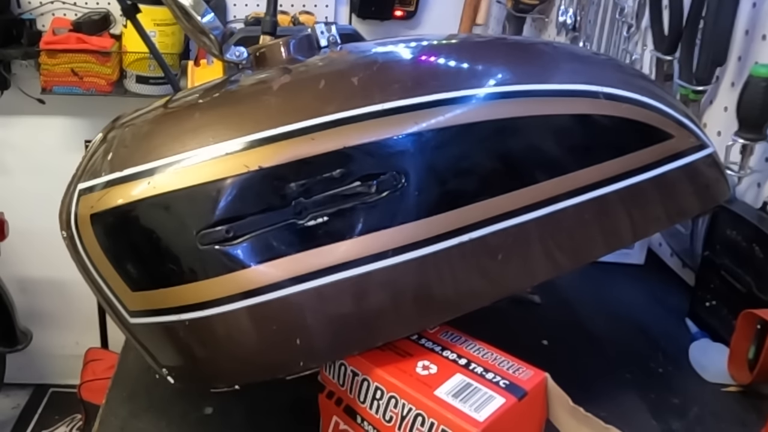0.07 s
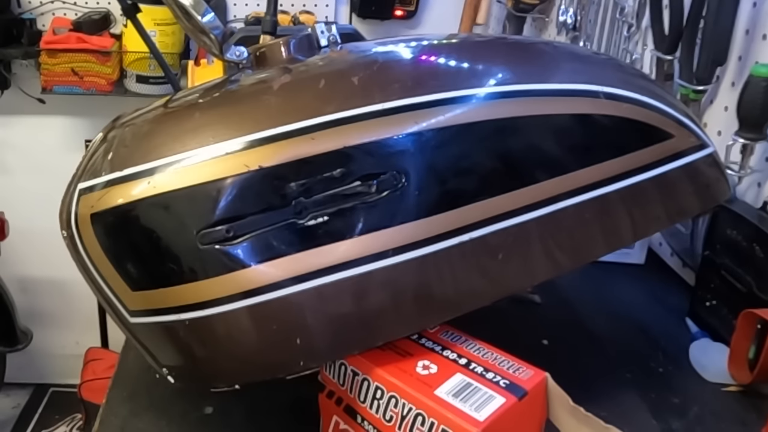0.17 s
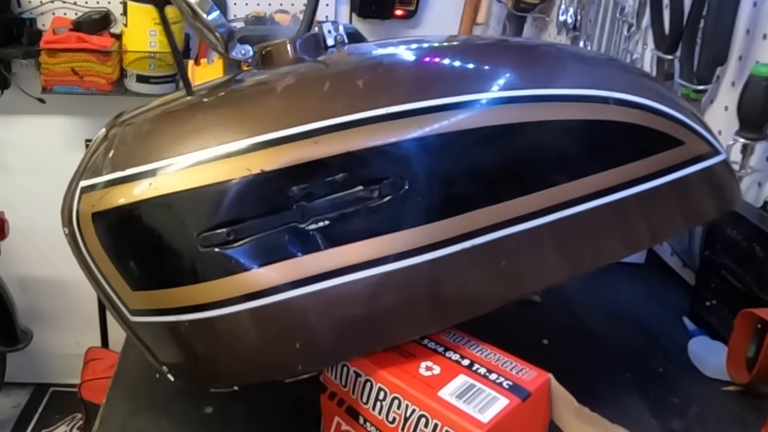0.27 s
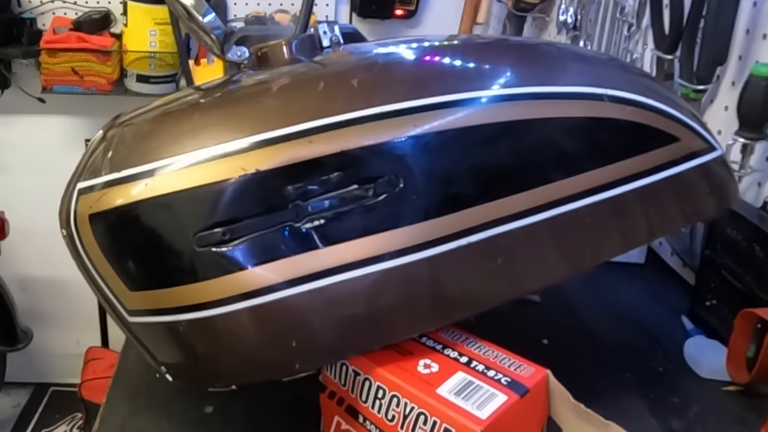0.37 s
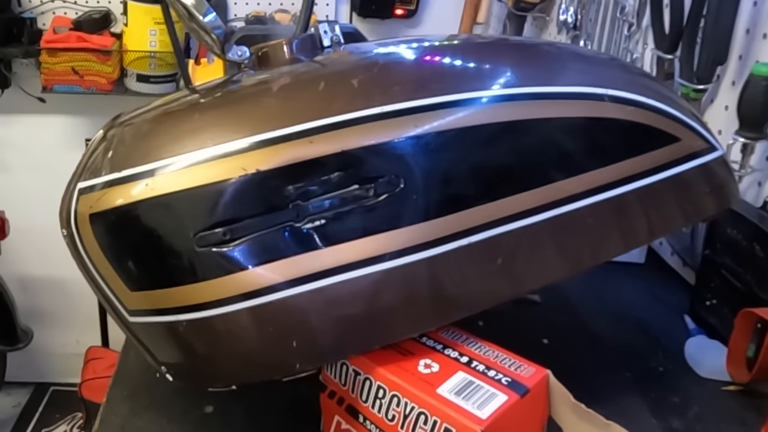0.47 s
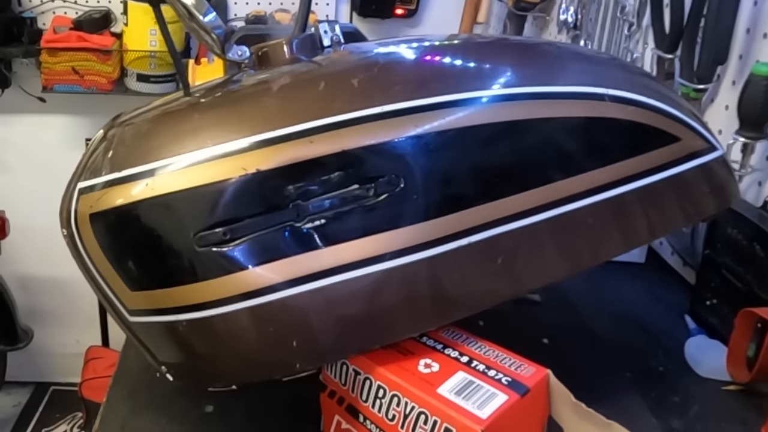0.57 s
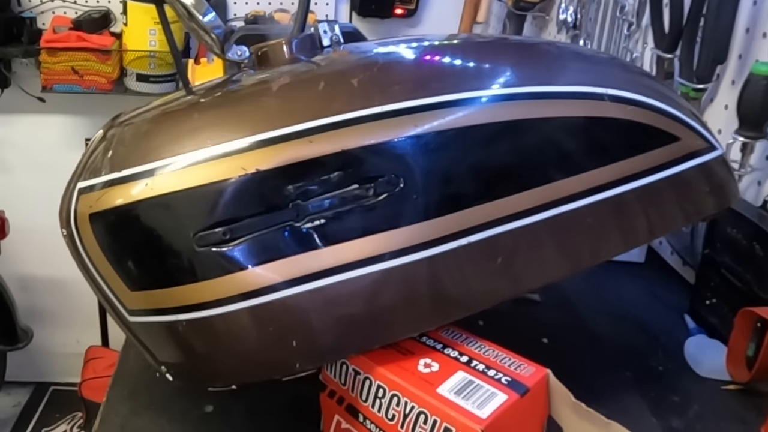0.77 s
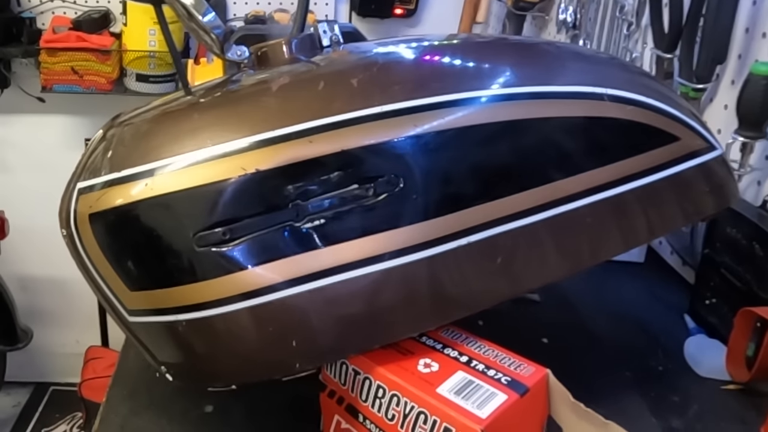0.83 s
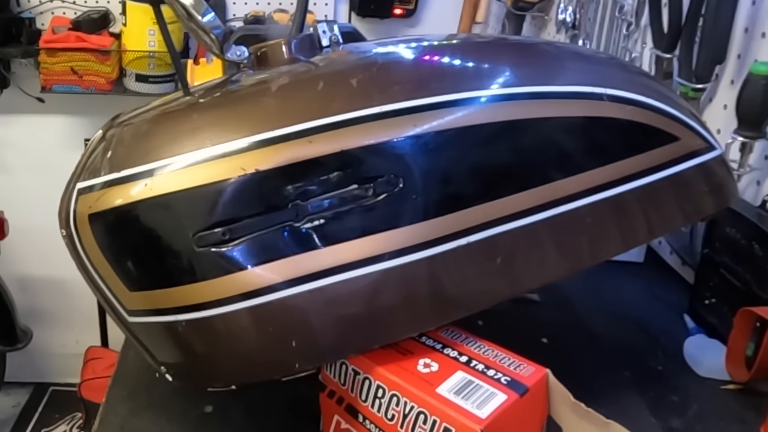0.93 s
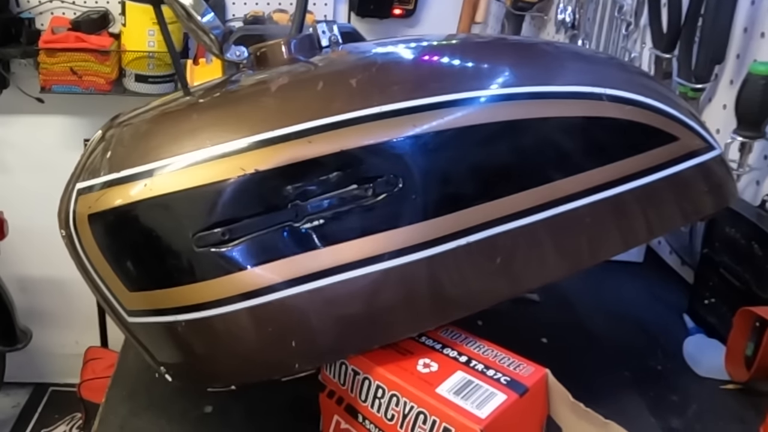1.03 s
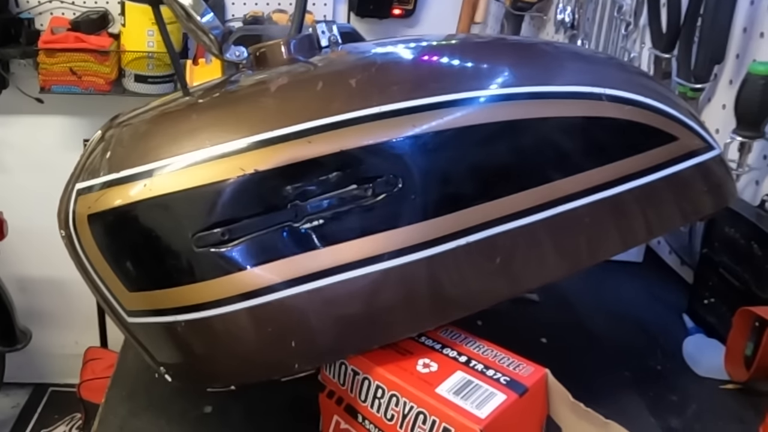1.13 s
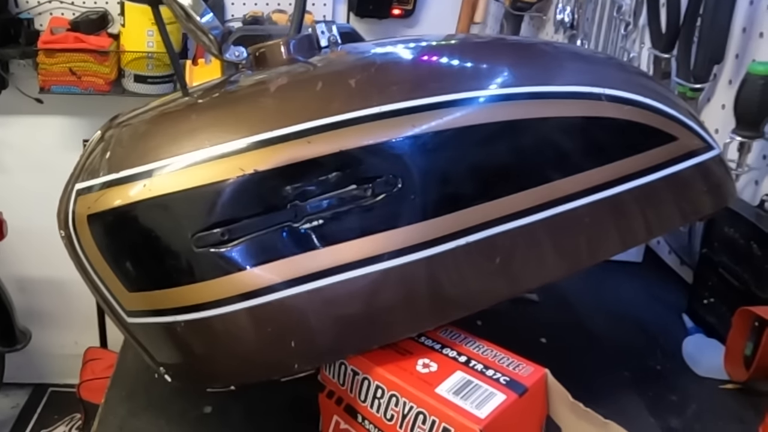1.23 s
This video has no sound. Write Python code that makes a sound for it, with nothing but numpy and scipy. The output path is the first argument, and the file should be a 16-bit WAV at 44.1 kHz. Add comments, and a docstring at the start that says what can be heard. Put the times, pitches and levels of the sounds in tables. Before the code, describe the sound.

One sudden, hollow bang from a metal tank in a workshop with a humming fan.

```python
"""A steel fuel tank gives one sudden bang in a small workshop.
The shell cracks and rings briefly; close low modes beat as the boom dies into the room.
A fan hums throughout, over steady room hum and rushing air.
Its pitch sags at the bang and creeps back; its level rises slowly from the bang on."""
import sys
import numpy as np
from scipy import signal
from scipy.fft import rfft, irfft, next_fast_len
from scipy.io import wavfile
from scipy.ndimage import uniform_filter1d, minimum_filter1d, map_coordinates

SR = 44100
rng = np.random.default_rng(int(sys.argv[2]) if len(sys.argv) > 2 else 0)


def dump(signal):
    """Clip the signal to [-1, 1] and save it as 16-bit WAV at the path in sys.argv[1]."""
    limited = np.clip(np.atleast_2d(signal).T, -1, 1)
    pcm = np.round(limited * 32767).astype(np.int16)
    wavfile.write(sys.argv[1], SR, pcm)


N = 57330

# workshop hum lines (frequency [Hz], rms level [dB])
HUM_LINES = [(119.5, -65), (156, -59.5), (222, -56), (240, -55), (292, -60.5), (350, -61.5), (548, -64),
             (645, -51.5), (1049, -66.5), (1193, -66)]
# rushing air (frequency [Hz], relative density [dB])
AIR_SPECTRUM = [(25, -32), (50, -9), (90, -10), (140, -2), (230, -3.5), (450, 0), (620, 3.5), (800, 2),
                (1100, -5.5), (1800, -11), (3000, -16.5), (6000, -20.5), (9000, -29.5), (12000, -40),
                (15500, -47)]
# fan tones (multiple of blade pitch, rms level before the bang [dB])
FAN_HARMONICS = [(1, -45), (4, -67)]
# wash of shell and room (frequency [Hz], relative density [dB])
WASH_SPECTRUM = [(25, -26), (60, -32), (105, -7.5), (180, -2.5), (250, -5), (320, -5.5), (400, 0.5),
                 (600, 0), (900, 0), (1200, -8), (1600, -7.5), (2300, -19), (4000, -23.5), (8000, -32),
                 (15500, -50.5)]
# wash decay (frequency [Hz], T60 [s])
WASH_DECAY = [(100, 0.57), (500, 0.6), (900, 0.6), (2000, 0.65), (6000, 0.62), (14000, 0.37)]
# brief, hard resonances of the blow (frequency [Hz], gain [dB], rise [s], T60 [s])
CLANK_MODES = [(830, 5, 0.001, 0.0093), (1420, 4, 0.016, 0.053), (2642, -15.5, 0.0024, 0.047),
               (3067, -10.5, 0.0025, 0.032)]
# first snap of the sheet (frequency [Hz], relative density [dB])
CRACK_SPECTRUM = [(60, -37), (350, -44), (800, 3.5), (1500, -7.5), (2200, -11.5), (3100, -9.5), (5000, -20),
                  (9000, -32.5), (15500, -34)]
# steel shell ring (frequency [Hz], gain [dB], T60 [s])
SHELL_MODES = [(431, -23.5, 0.53), (490, -20, 0.51), (554, -17.5, .42), (586.2, -16.5, 0.32),
               (616.6, -14.5, 0.45), (660, -29, .42), (756.4, -19.5, 0.69), (807.6, -26, 0.6),
               (870, -39, .58), (923, -25, .62), (967, -32, 0.83), (1077, -36, 0.96), (1102, -25, 0.43),
               (1390, -23.5, 0.59)]
# close modes of the hollow boom (frequency [Hz], gain [dB])
BOOM_MODES = [(305, -6), (310.7, -4), (317.1, -8), (329.2, -8.5), (331.7, -14.5), (336, -4.5), (370, -13.5)]
# deep air modes (frequency [Hz], gain [dB], T60 [s])
THUD_MODES = [(49.5, -30, 0.77), (71.6, -26.5, .5), (123.3, -23.5, 0.38), (156.6, -27.5, .5)]

BANG_S = 0.2187
AIR_DB, HUM_FLUTTER_DB, HUM_WAVER_RAD = -43, 4, 0.51
BLADE_HZ, FAN_WAVER_HZ, FAN_FLUTTER_DB, FAN_GROWTH_DB_PER_S = 599.2, 2.2, 2.5, 4
SAG_HZ, SAG_S, RECOVER_S, SETTLED_DROP_HZ = 18, 0.2596, 0.168, 4.05
WASH_DB, WASH_RISE_S = -12, 0.0029
CRACK_DB, CRACK_RISE_S, CRACK_T60_S = -14.5, 0.0008, 0.095
SHELL_RISE_S, THUD_RISE_S = 0.009, 0.0033
BOOM_RISE_S, BOOM_T60_S = 0.055, 0.52
CEILING, LIMITER_S, LOWPASS_HZ = 0.84, 0.0066, 15750


def amp(db):
    """Decibels to gain."""
    return 10 ** (np.asarray(db) / 20)


def along(points, hz):
    """Interpolate (frequency [Hz], value) points on a log frequency axis."""
    knots_hz, values = np.transpose(points)
    return np.interp(np.log(hz + 1), np.log(knots_hz + 1), values)


def wobble(knots_per_s):
    """Smooth random curve, rms near 1."""
    return map_coordinates(rng.standard_normal(N), [np.arange(N) * knots_per_s / SR + 2], order=3)


def filtered(x, response):
    """Zero-phase filter with gain response(hz)."""
    size = next_fast_len(N + SR // 2)
    hz = np.fft.rfftfreq(size, 1 / SR)
    return irfft(rfft(x, size) * response(hz), size)[..., :N]


def noise(spectrum):
    """Coloured noise, rms 1."""
    x = filtered(rng.standard_normal(N), lambda hz: amp(along(spectrum, hz)))
    return x / x.std()


def since_bang():
    """Time since the bang [s], zero before it."""
    return np.maximum(np.arange(N) / SR - BANG_S, 0)


def decay(t, t60_s):
    """Gain falling 60 dB per t60_s."""
    return np.exp(-np.log(1000) * t / t60_s)


def struck(rise_s, t60_s):
    """Envelope: swells from the bang, dies away."""
    t = since_bang()
    return (1 - np.exp(-t / rise_s)) * decay(t, t60_s)


def mode(hz, db, rise_s, t60_s):
    """One resonance excited by the bang."""
    return amp(db) * struck(rise_s, t60_s) * np.sin(2 * np.pi * hz * since_bang())


def alternating_modes(modes, rise_s):
    """Sum of modes; neighbours swing in opposite senses."""
    return sum((-1) ** k * mode(hz, db, rise_s, t60_s) for k, (hz, db, t60_s) in enumerate(modes))


def workshop():
    """Slightly unsteady hum lines over rushing air."""
    t = np.arange(N) / SR
    hum = 0
    for hz, db in HUM_LINES:
        rms = amp(db + HUM_FLUTTER_DB * wobble(12.11))
        phase_rad = 2 * np.pi * (hz * t + rng.random()) + HUM_WAVER_RAD * wobble(14.67)
        hum += rms * np.sin(phase_rad)
    return np.sqrt(2) * hum + amp(AIR_DB) * noise(AIR_SPECTRUM)


def fan():
    """Blade tone: slows after the bang, recovers to just under its old pitch, grows louder."""
    t = since_bang()
    slowing = np.minimum(t / SAG_S, 1)
    sag_left = np.exp(-np.maximum(t - SAG_S, 0) / RECOVER_S)
    drop_hz = slowing * (SETTLED_DROP_HZ + (SAG_HZ - SETTLED_DROP_HZ) * sag_left)
    pitch_hz = BLADE_HZ - drop_hz + FAN_WAVER_HZ * wobble(25.8)
    phase_rad = 2 * np.pi * np.cumsum(pitch_hz) / SR
    tones = 0
    for multiple, db in FAN_HARMONICS:
        rms = amp(db + FAN_GROWTH_DB_PER_S * t + FAN_FLUTTER_DB * wobble(17.7))
        tones += rms * np.sin(multiple * phase_rad)
    return np.sqrt(2) * tones


def wash():
    """Dense weak modes of shell and room, as noise; each band decays at its own rate."""
    hz, frame_s, bands = signal.stft(noise(WASH_SPECTRUM), SR, nperseg=512)
    bands *= decay(np.maximum(frame_s - BANG_S, 0), along(WASH_DECAY, hz)[:, None])
    tail = signal.istft(bands, SR)[1][:N]
    onset = 1 - np.exp(-since_bang() / WASH_RISE_S)
    return amp(WASH_DB) * tail * onset


def tank():
    """One blow: the sheet clanks and cracks, the shell rings, close modes beat, air modes thud."""
    clank = sum(mode(*row) for row in CLANK_MODES)
    crack = amp(CRACK_DB) * struck(CRACK_RISE_S, CRACK_T60_S) * noise(CRACK_SPECTRUM)
    shell = alternating_modes(SHELL_MODES, SHELL_RISE_S)
    boom = sum(mode(hz, db, BOOM_RISE_S, BOOM_T60_S) for hz, db in BOOM_MODES)
    thud = alternating_modes(THUD_MODES, THUD_RISE_S)
    return clank + crack + shell + boom + thud


def scene():
    """Bang and wash over fan and workshop, mono."""
    return (tank() + wash() + fan() + workshop())[None]


def record(dry):
    """Fast peak limiter, then brick-wall low-pass."""
    window = int(LIMITER_S * SR)
    needed_gain = CEILING / np.maximum(np.abs(dry), CEILING)
    gain = uniform_filter1d(minimum_filter1d(needed_gain, window), window)
    return filtered(dry * gain, lambda hz: hz < LOWPASS_HZ)


dry = scene()
out = record(dry)
dump(out)
```